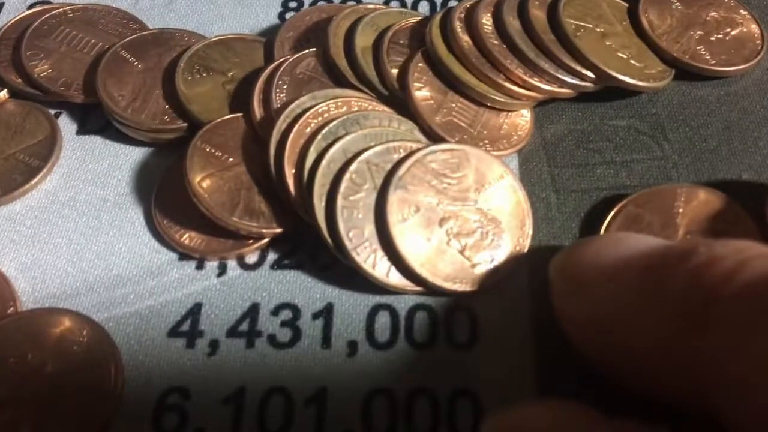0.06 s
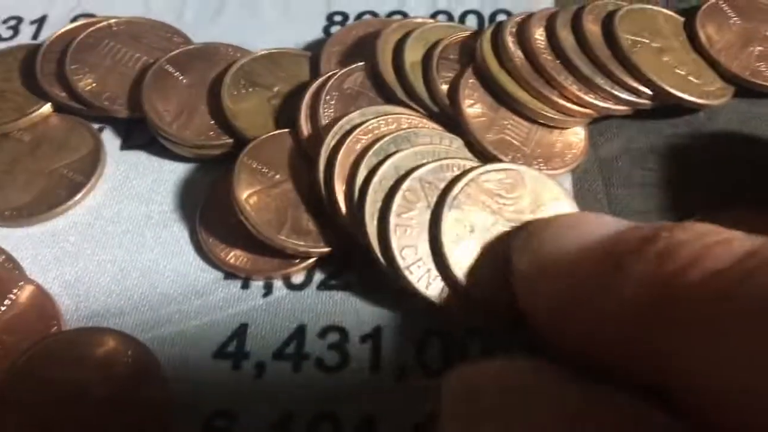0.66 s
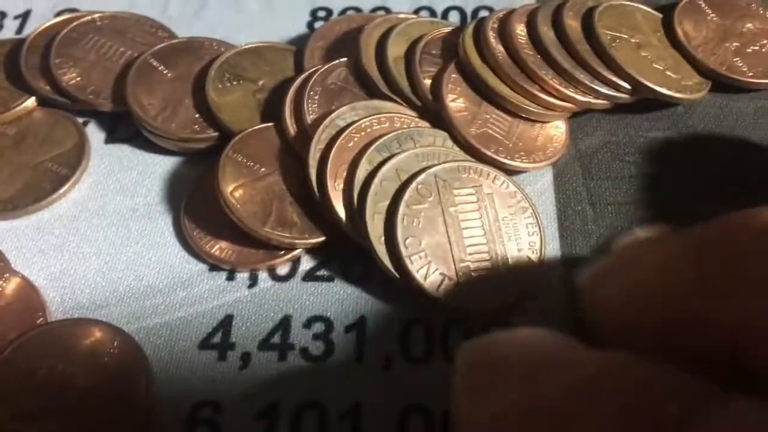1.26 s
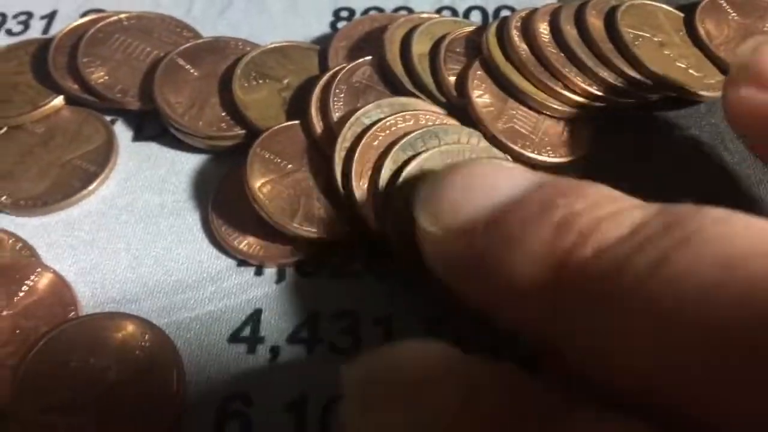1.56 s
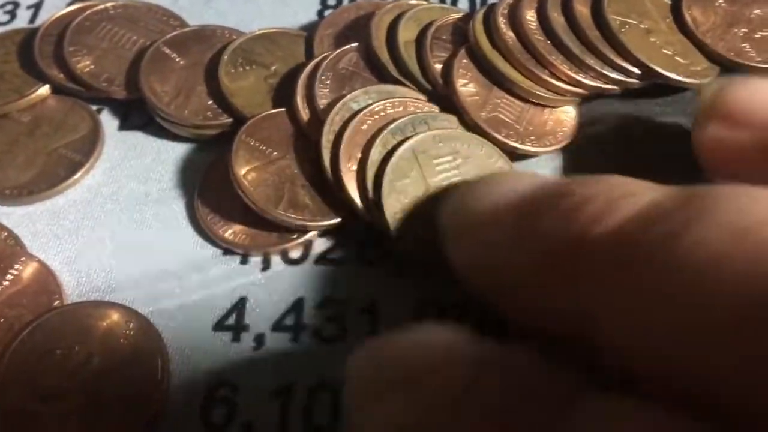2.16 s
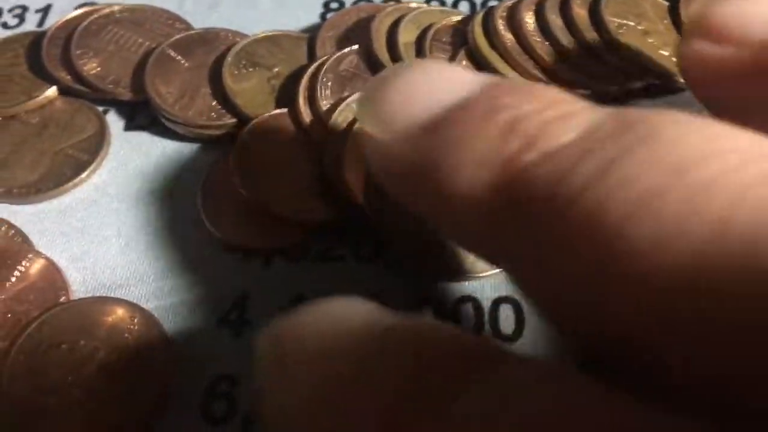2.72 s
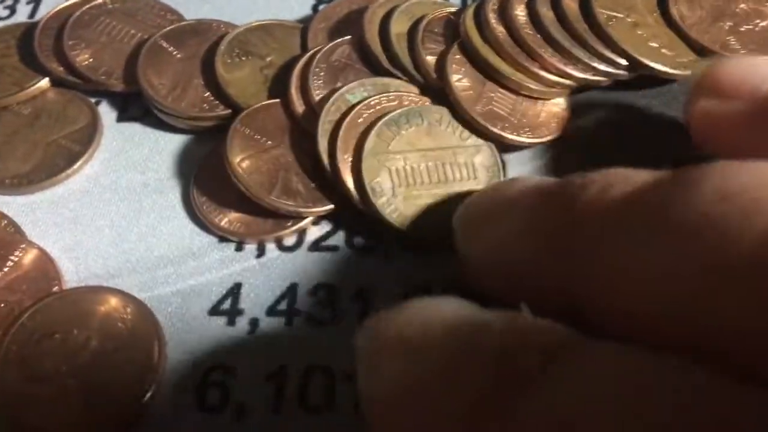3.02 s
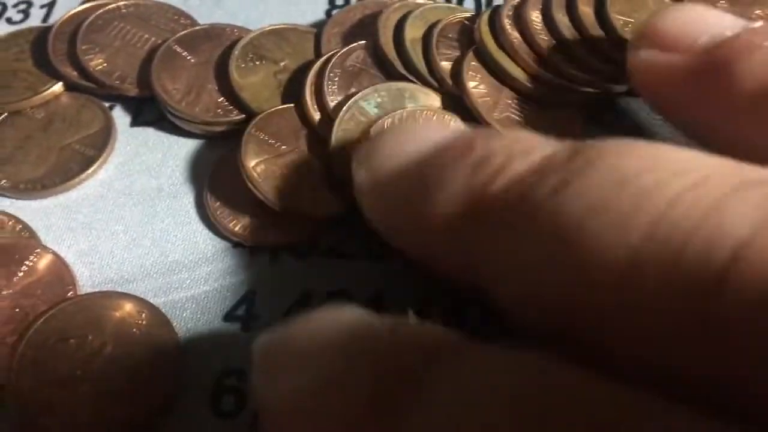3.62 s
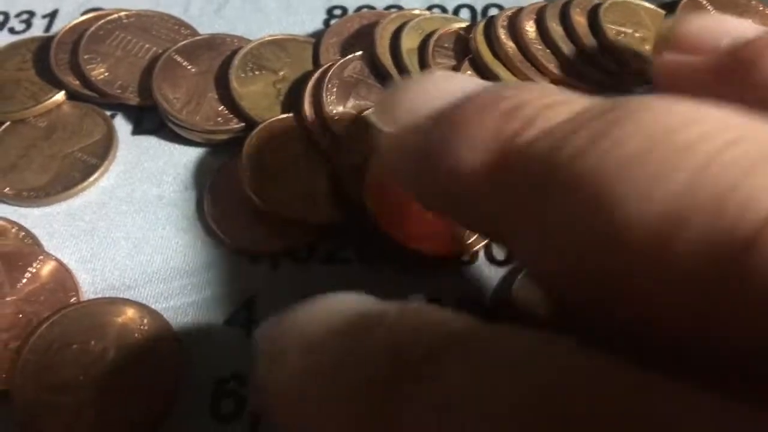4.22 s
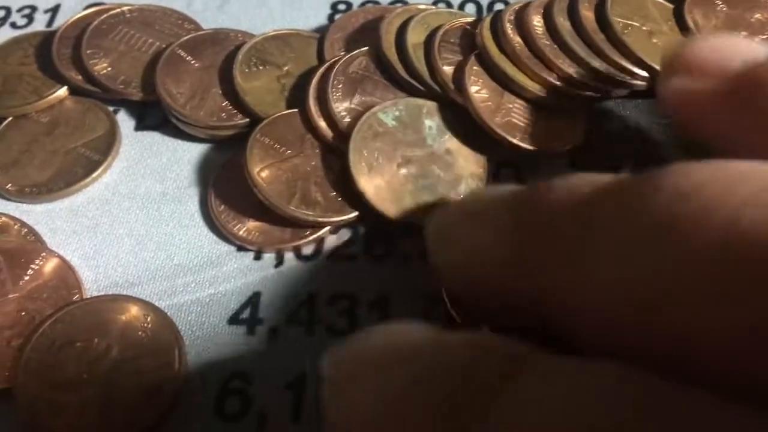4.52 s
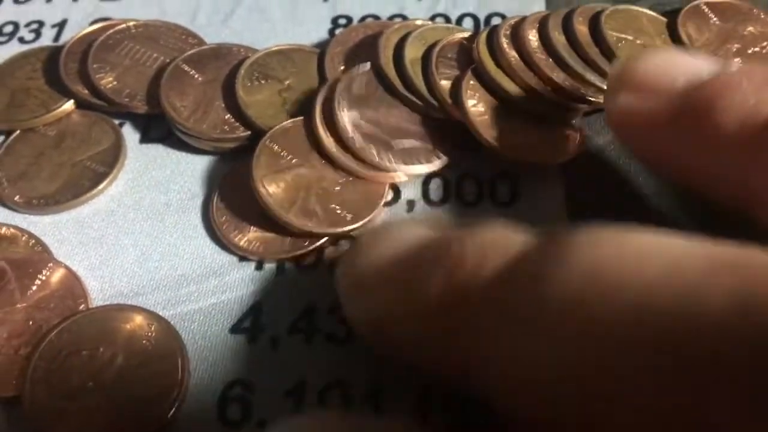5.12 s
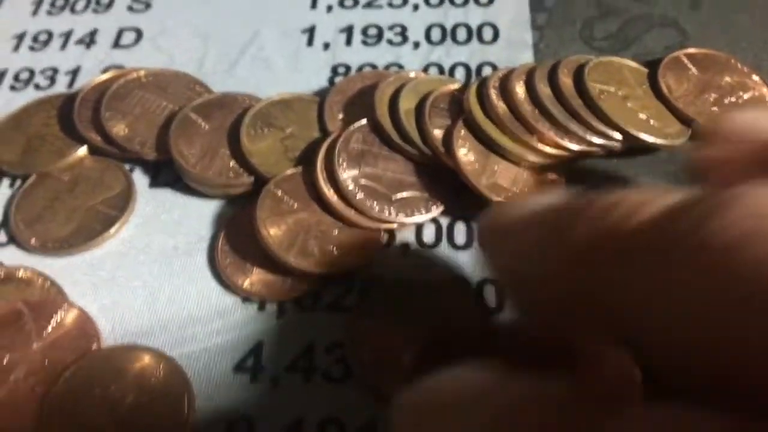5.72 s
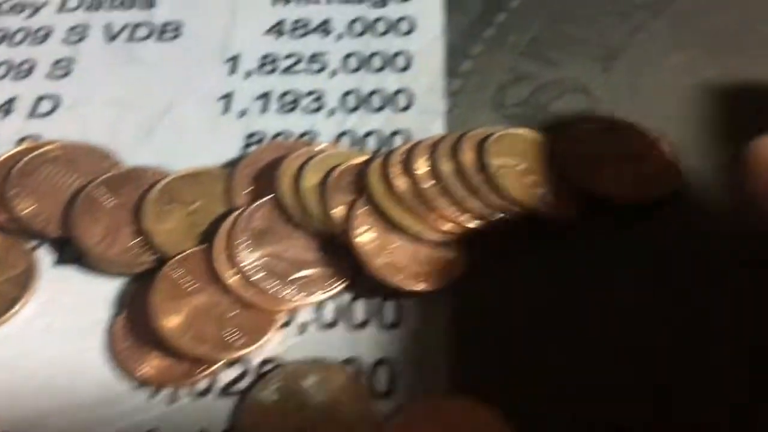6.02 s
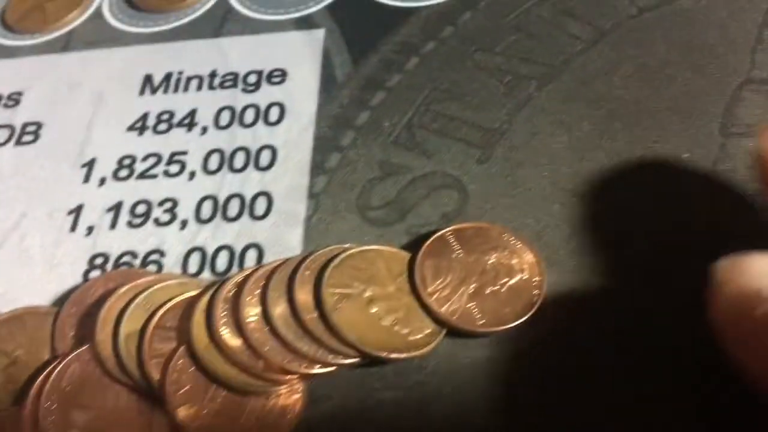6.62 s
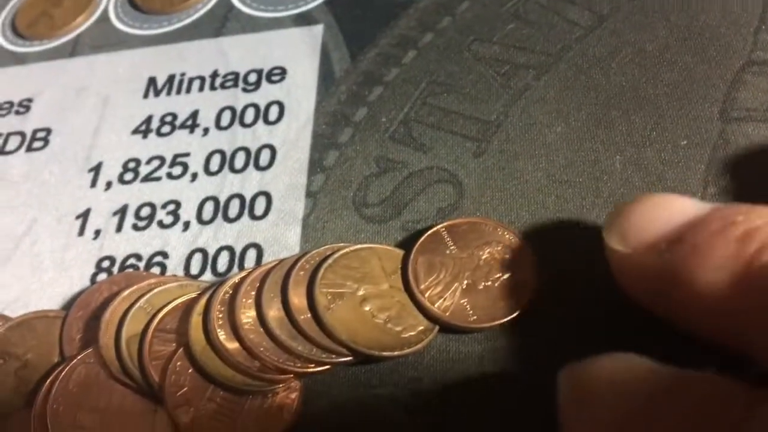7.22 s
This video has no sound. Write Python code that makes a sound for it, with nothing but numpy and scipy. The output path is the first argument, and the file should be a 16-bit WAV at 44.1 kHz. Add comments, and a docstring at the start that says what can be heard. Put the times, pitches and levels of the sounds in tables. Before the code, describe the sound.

Copper coins are slid by a fingertip off an overlapping row onto paper on a table, heard close and only on the left. A few faint metal ticks begin around 0.3 seconds and grow near 0.9. At about 1.1 seconds the first coin scrapes over its neighbours and tips onto the table with a light knock and a bright chatter, its very high ring quickly stilled. Five more coins follow, landing at about 2.3, 3.1, 3.9, 4.6 and 5.2 seconds, each with small clicks, a short gritty scrape and a knock, most with a brief ring. Between them come stray ticks and the soft rub of skin on paper. A soft tap at 5.7 seconds leads into a quiet, dry swish, with fainter ones around 6.4 and 7.1. A faint, low appliance hum fills the small room throughout.

```python
"""Copper coins, dragged one by one by a fingertip off an overlapping row on paper on a table, close by.
Six times a coin clicks, scrapes over its neighbours and tips onto the table, which knocks as it bends.
The coins chatter with a short, high ring until the finger stills them. In between the finger rubs
the paper; a small room hums faintly. Left channel only."""
import sys
import numpy as np
from scipy import signal
from scipy.fft import rfft, irfft, next_fast_len
from scipy.io import wavfile
from scipy.ndimage import map_coordinates

SR = 44100
rng = np.random.default_rng(int(sys.argv[2]) if len(sys.argv) > 2 else 0)


def wrap_up_sound(samples):
    """Save the sound to the file named by the first command line argument, as 16-bit audio."""
    columns = np.atleast_2d(samples).T
    # keep every value between -1 and 1, then stretch to whole-number steps
    tamed = np.clip(columns, -1, 1)
    steps = np.round(tamed * 32767).astype(np.int16)
    wavfile.write(sys.argv[1], SR, steps)


N = 320607


def amp(db):
    return 10 ** (np.asarray(db) / 20)


def unit_rms(x):
    return x / np.sqrt(np.mean(x ** 2) + 1e-20)


def log_interp(points, hz):
    """(f/Hz, value) points read on a log frequency axis."""
    f, values = np.transpose(points)
    return np.interp(np.log(hz + 1), np.log(f + 1), values)


def wobble(knots_per_s):
    """Smooth random curve."""
    knots = rng.standard_normal(int(N * knots_per_s / SR) + 4)
    return map_coordinates(knots, [np.arange(N) * knots_per_s / SR])


def filtered(x, response):
    """x through a gain given as a function of f/Hz."""
    size = next_fast_len(N + SR // 2)
    return irfft(rfft(x, size) * response(np.fft.rfftfreq(size, 1 / SR)), size)[:N]


def coloured(x, spectrum):
    """x shaped by a spectrum, at rms 1."""
    return unit_rms(filtered(x, lambda hz: amp(log_interp(spectrum, hz))))


def minimum_phase(db):
    """Causal response with these gains."""
    cepstrum = irfft(np.log(amp(db) + 1e-6))
    half = len(cepstrum) // 2
    cepstrum[1:half] *= 2
    cepstrum[half + 1:] = 0
    return np.exp(rfft(cepstrum))


def resonance(hz, width_hz):
    """Narrow noise band at rms 1; centre given per sample."""
    lowpass = signal.butter(2, width_hz / 2, fs=SR, output="sos")
    a, b = signal.sosfilt(lowpass, rng.standard_normal((2, len(hz))))
    phase = 2 * np.pi * np.cumsum(hz) / SR
    return unit_rms(a * np.cos(phase) + b * np.sin(phase))


def add(track, start_s, sound):
    i = max(round(start_s * SR), 0)
    track[i:i + len(sound)] += sound[:max(N - i, 0)]


# Room noise spectrum: f/Hz, level/dB
AIR_SPECTRUM = [(15, -50.5), (25, -22), (87, -5.5), (123, -1.5), (212, -7.5), (242, -9), (326, -14.5),
                (354, -18.5), (463, -17), (560, -16.5), (1020, -29.5), (1190, -27), (1650, -48.5),
                (2220, -40.5), (16000, -57.5)]
# Appliance hum partials: f/Hz, level/dB
HUM_PARTIALS = [(75, -74), (134, -62), (241, -63), (360.7, -73.5), (436, -75), (554.5, -70.5),
                (742.9, -77.5)]


def room_noise(air_db=-55, hum_db=-1, waver_rad=0.51, flutter_db=2):
    """Low room noise and an appliance's slightly unsteady hum."""
    t, hum = np.arange(N) / SR, np.zeros(N)
    for hz, db in HUM_PARTIALS:
        peak = np.sqrt(2) * amp(db + flutter_db * wobble(4.1))
        hum += peak * np.sin(2 * np.pi * hz * t + waver_rad * wobble(4.8))
    return amp(air_db) * coloured(rng.standard_normal(N), AIR_SPECTRUM) + amp(hum_db) * hum


# Paper friction spectrum: f/Hz, level/dB
RUB_SPECTRUM = [(150, -18), (400, 9), (650, 4.5), (900, -1), (1400, 0.5), (1950, 4), (2300, -5.5),
                (2800, -4), (3500, -17), (4800, -17.5), (6200, -12.5), (8000, -28), (9500, -15.5),
                (15000, -42)]


def finger_rub(peak_db=-61, rest_db=-77, lead_s=0.084, slope_db_per_s=42, fibre_db=2):
    """The finger rubs softly over paper and coins, hardest just before each landing."""
    t = np.arange(N) / SR
    envelope = amp(rest_db)
    for _, landing, *_ in COIN_DRAGS:
        away_s = np.maximum(landing - lead_s - t, 0) + np.maximum(t - landing, 0)
        envelope = np.maximum(envelope, amp(peak_db - slope_db_per_s * away_s))
    fibres = amp(fibre_db * wobble(200)) * rng.standard_normal(N)
    return envelope * coloured(fibres, RUB_SPECTRUM)


# Coin edges catching on each other: t/s, level/dB, brightness/dB
EDGE_CATCHES = [(0.298, -58.5, -20), (.311, -52, -17), (.332, -73, -19), (0.353, -64, -33),
                (0.3727, -72, -32), (.5257, -48, -7), (.803, -58, -13), (0.818, -58, -2.5),
                (.923, -43.5, 4.5), (0.9257, -35, -6), (0.9302, -45, 6), (0.996, -55.5, -0.5),
                (1.041, -50.5, -5.5), (1.081, -40.5, -10), (1.0867, -35.5, 0), (1.094, -39, 3),
                (1.133, -27.5, 20.5), (1.1446, -33.5, 2), (1.157, -29, 12.5), (1.176, -40, 1.5),
                (1.273, -63, -31), (1.6031, -44.5, -4.5), (2.019, -61, 5), (2.026, -44, -7),
                (2.037, -40, -17.5), (2.046, -54, 3.5), (2.123, -46, -3), (2.154, -53, -18),
                (2.1814, -47, 0), (2.213, -52, -12.5), (2.238, -40, 0.5), (2.276, -46.5, -6),
                (2.288, -40.5, 2), (2.3079, -31, 8.5), (2.858, -34, -2.5), (2.863, -33.5, 0),
                (2.88, -43.5, -2), (2.9411, -39.5, -1), (2.958, -44, -7), (2.994, -47, -3),
                (3.004, -53, -8), (3.022, -43.5, -1), (3.035, -40.5, -2), (3.08, -37.5, 0), (3.082, -41, 4),
                (3.105, -64, -12), (3.618, -36.5, 0.5), (3.6348, -41, 2), (3.695, -46, -10),
                (3.72, -48, -11), (3.733, -48, -12), (3.776, -51.5, -21), (3.819, -44.5, -10),
                (3.837, -39.5, 0), (3.8635, -43, -2), (4.369, -43.5, -6), (4.3875, -63, -12),
                (4.48, -45, -11), (4.543, -38, 9), (4.582, -48, 15), (4.601, -47.5, 1), (4.642, -49, -9),
                (5.021, -42.5, -4), (5.029, -47, -6), (5.07, -50, -6), (5.1239, -45.5, -4),
                (5.136, -39, -1.5), (5.159, -41.5, 10), (5.1693, -56, -3), (5.21, -34.5, 4.5),
                (5.2134, -29, 5.5), (5.2477, -52, -6), (6.585, -73.5, -11)]


def contacts(graze_s=0.0018, graze_db=-21.5, rebound_s=0.0056, rebound_db=-10,
             tick_gap_s=1 / 70, tick_db=0.5, tick_spread_db=6.5, tick_bright_db=-10.5):
    """Rims graze, catch and rebound; a dragged coin ticks. Rows: t/s, level/dB, brightness/dB."""
    rows = list(EDGE_CATCHES)
    for s, db, bright_db in EDGE_CATCHES:
        rows.append((s - graze_s, db + graze_db, bright_db))
        rows.append((s + rebound_s * rng.uniform(.6, 2.5), db + rebound_db, bright_db))
    for start, landing, db, swell_db, *_ in COIN_DRAGS:
        gaps, louds, brights = rng.standard_normal((32, 3)).T
        times = start + tick_gap_s * np.cumsum(np.exp(.5 * gaps))
        for s, loud, bright in zip(times[times < landing + 2 * SETTLE_S], louds, brights):
            level_db = scrape_db(s, start, landing, db, swell_db) + tick_db + tick_spread_db * loud
            rows.append((s, level_db, tick_bright_db + 2 * tick_spread_db * bright))
    return rows


# Metal-on-metal spectrum: f/Hz, level/dB
CLICK_SPECTRUM = [(200, 5.5), (600, -11), (1200, -17.5), (1950, 2.5), (2250, -4), (2650, 2), (3600, -18),
                  (4600, -9), (6200, 1), (8000, 0), (11000, -1), (13500, 4.5), (15300, -2), (16500, -30)]


def coin_clicks(firm_t60_s=0.014, firm_db=-36, doubling_db=22, attack_s=0.0009, tail_db=-33,
                tail_t60_s=0.087, grit_db=-4, spot_db=1, light_db=-48, thinning=.8, gain_db=1, size=4096):
    """Bursts of tiny slips, choked by finger and pile; light contacts are shorter and thinner."""
    out, t, hz = np.zeros(N), np.arange(size) / SR, np.fft.rfftfreq(size, 1 / SR)
    treble = 1 / (1 + (10500 / (hz + 1)) ** 8)
    body = 1 / (1 + (hz / 3800) ** 8)
    for s, db, bright_db in contacts():
        t60_s = firm_t60_s * 2 ** ((db - firm_db) / doubling_db)
        decay = amp(-60 * t / t60_s) + amp(tail_db - 60 * t / tail_t60_s)
        grit = amp(grit_db * map_coordinates(rng.standard_normal(size), [np.arange(size) / 20]))
        slips = rng.standard_normal(size) * grit * (1 - np.exp(-t / attack_s)) * decay
        # each contact point has its own resonances
        ripple_db = spot_db * map_coordinates(rng.standard_normal(size), [hz / 450])
        tilt_db = bright_db * treble + thinning * min(db - light_db, 0) * body
        click = irfft(rfft(slips) * minimum_phase(log_interp(CLICK_SPECTRUM, hz) + tilt_db + ripple_db))
        click *= np.sqrt(.004 * SR) / np.linalg.norm(click)  # energy of 4 ms at rms 1
        add(out, s, amp(db + gain_db) * click)
    return out


# Landed coins rocking free: t/s, f/Hz, level/dB, time until the finger stills them/s
FREE_RINGS = [(1.132, 12520, -30, 0.026), (1.1436, 12050, -31, 0.039), (1.157, 12230, -22, 0.018),
              (1.1652, 12800, -28.5, 0.049), (1.1751, 12760, -30, .025), (2.2913, 12300, -32, 0.027),
              (2.3084, 12600, -20.5, 0.035), (3.076, 12830, -28, 0.038), (3.8548, 12860, -29, 0.026),
              (3.865, 12880, -32, 0.051), (5.214, 12130, -31, .015)]


def coin_rings(attack_s=.0009, split_hz=165, twin_db=-13, grip_power=1.7, pile_db=-33, pile_t60_s=0.1,
               coin_hz=12550, spread_hz=120, catch_db=-10.5, catch_t60_s=0.018, gain_db=2):
    """A coin's lowest bending mode, a close pair, is damped ever faster; the pile rings on weakly."""
    out, t = np.zeros(N), np.arange(SR // 6) / SR

    def tone(hz):
        return np.sin(2 * np.pi * (hz * t + rng.random()))

    # each catch also rings its coin, a dull one less
    damped = [(s, rng.normal(coin_hz, spread_hz), db + catch_db + min(bright_db, 0), catch_t60_s)
              for s, db, bright_db in EDGE_CATCHES]
    for s, hz, db, t60_s in FREE_RINGS + damped:
        drift_rad = 0.11 * np.cumsum(rng.standard_normal(len(t)))  # shifting pressure bends the pitch
        pair = np.sin(2 * np.pi * hz * t + drift_rad) + amp(twin_db) * tone(hz - split_hz)
        pile = tone(hz) + .4 * tone(12580) + .4 * tone(12010) + .2 * tone(13355) + .2 * tone(10765)
        ring = pair * amp(-60 * (t / t60_s) ** grip_power) + pile * amp(pile_db - 60 * t / pile_t60_s)
        add(out, s, amp(db + gain_db) * ring * (1 - np.exp(-t / attack_s)))
    return out


# Table's response to a knock: f/Hz, level/dB
KNOCK_SPECTRUM = [(30, -26), (70, -5.5), (150, -3.5), (240, 1), (380, 5), (620, 1), (800, -11.5),
                  (1200, -5), (1800, -8), (2300, -22.5), (2800, -23.5), (3600, -46), (7000, -62.5)]
# Its lasting modes: f/Hz, level/dB, t60/s
KNOCK_MODES = [(72.5, -24, .2), (138.5, -42, .12), (243, -33, 0.042), (339.2, -21.5, 0.092),
               (547, -36, 0.044), (654, -30.5, 0.03)]


def table_knocks(spread_s=0.000818, hard_hz=900, scatter_db=-33, scatter_t60_s=0.046, spot_octaves=0.4,
                 nudge_db=-6.5, nudge_hard_db=-1, nudge_hz=2600, nudge_lift_db=12, size=8192):
    """Bending waves cross the table, high ones first; its edges scatter them, its modes ring on."""
    out, t, hz = np.zeros(N), np.arange(size) / SR, np.fft.rfftfreq(size, 1 / SR)
    dispersion = np.exp(-4j * np.pi * spread_s * np.sqrt(hz * hard_hz))
    landings = [(drag[1], *drag[-4:]) for drag in COIN_DRAGS]
    nudges = [(s, db + nudge_db, nudge_hard_db, nudge_hz, nudge_lift_db) for s, db, _ in EDGE_CATCHES]
    for s, db, hardness_db, spot_hz, lift_db in landings + nudges:
        push = amp(scatter_db - 60 * t / scatter_t60_s) * rng.standard_normal(size)
        push[0] = 1  # direct impact
        spot_db = lift_db * np.exp(-(np.log2((hz + 1) / spot_hz) / spot_octaves) ** 2)
        shelf_db = hardness_db * hz ** 2 / (hz ** 2 + hard_hz ** 2)
        response = minimum_phase(log_interp(KNOCK_SPECTRUM, hz) + spot_db + shelf_db)
        knock = irfft(rfft(push) * response * dispersion)
        knock /= np.abs(knock).max()
        for mode_hz, mode_db, t60_s in KNOCK_MODES:
            decay = amp(mode_db + rng.normal(0, 2.4) - 60 * t / t60_s)
            build_up = 1 - np.exp(-mode_hz * t)
            knock += build_up * decay * np.sin(2 * np.pi * mode_hz * t)
        add(out, s, amp(db) * knock)
    return out


# Finger sweeps over paper and coins, and one soft tap at 5.68 s:
# start/s, end/s, level/dB, hiss f/Hz, relative hiss level/dB
FINGER_TOUCHES = [(0.407, 0.557, -74.5, 6000, -27), (0.787, 0.884, -64, 6000, -14),
                  (1.42, 1.603, -64, 6000, -15), (1.6, 2.04, -73, 6000, -9.5),
                  (2.357, 2.568, -67.5, 6000, -11.5), (2.701, 2.857, -65, 6000, -15),
                  (3.489, 3.632, -63, 6100, -13), (4.011, 4.124, -73, 6100, -22),
                  (5.675, 5.703, -68, 6100, -24), (5.744, 5.922, -59, 6100, -5.5),
                  (6.184, 6.603, -76.5, 3720, 0.5), (7.086, 7.241, -71, 6200, -10)]
# Swish spectrum: f/Hz, level/dB
SWISH_SPECTRUM = [(500, -4), (1300, 6.5), (1950, 11), (2300, 5.5), (2800, 3.5), (3500, -11), (4600, -1.5),
                  (5400, -17), (8500, -7), (10500, -10), (15500, -17.5)]


def finger_touches(width_hz=1300, fade_db=5, fibre_db=1.5):
    """Skin on paper: a dry swish with one hissing resonance; the shortest is heard as a soft tap."""
    out = np.zeros(N)
    for start, end, db, hiss_hz, hiss_db in FINGER_TOUCHES:
        n = round((end - start) * SR)
        swish = coloured(rng.standard_normal(N), SWISH_SPECTRUM)[:n]
        hiss = amp(hiss_db) * resonance(np.full(n, hiss_hz), width_hz)
        envelope = amp(db - fade_db * np.linspace(0, 1, n) ** 2) * signal.windows.tukey(n, .45)
        add(out, start, envelope * (swish + hiss))
    return out * amp(fibre_db * wobble(200))


SETTLE_S, STOP_DB_PER_S = 0.015, 380.5


def scrape_db(t, start, landing, db, swell_db):
    """A scrape swells up to the landing, holds while the coin settles, then dies."""
    to_go = np.clip((landing - t) / (landing - start), 0, 1)
    return db - swell_db * to_go - STOP_DB_PER_S * np.maximum(t - landing - SETTLE_S, 0)


# Coins dragged off the row: start/s, landing/s, final scrape level/dB, swell/dB, starting resonance/Hz,
# table murmur/dB, knock level/dB, hardness/dB, landing spot's resonance/Hz, its lift/dB
COIN_DRAGS = [(1.023, 1.131, -46, 16, 7000, -44, -18, -22, 713, 11.5),
              (2.112, 2.2919, -61.5, 6, 6000, -48.5, -14, -4.5, 1310, 6),
              (2.93, 3.082, -54, 8, 6300, -47, -14.5, 15.5, 686, 9.5),
              (3.682, 3.8562, -51.5, 22.5, 9200, -48.5, -18, -1, 680, 8.5),
              (4.421, 4.5661, -52.5, 12, 7400, -49, -20, 15.5, 288, 12),
              (5.028, 5.207, -52.5, 2, 8030, -54, -16.5, -4.5, 770, 10)]
# Coin grating on coin: f/Hz, level/dB
GRATING_SPECTRUM = [(1200, -11), (2000, 1), (2800, -4.5), (3700, -7.5), (4700, -2), (6200, -9), (9300, -6),
                    (10700, -23), (13000, 5.5), (15300, -12.5), (16300, -19.5)]
# Table's murmur under a scrape: f/Hz, level/dB
MURMUR_SPECTRUM = [(100, -19.5), (270, 6.5), (400, -1.5), (650, -2.5), (900, -15.5), (1800, -20.5),
                   (3000, -38.5)]


def coin_scrapes(landed_hz=6490, width_hz=900, song_db=-2, upper_ratio=1.27, upper_db=-5, grit_db=6,
                 judder_db=5, dull_db=-9, dull_hz=10500, attack_s=0.017, table_swell_db=12, gain_db=-3):
    """Embossed faces grate in uneven slips, ever brighter, exciting coin resonances and the table."""
    out, t = np.zeros(N), np.arange(N) / SR
    # tanh: the relief is of even height, so no slip stands out
    judder = unit_rms(amp(judder_db * np.tanh(wobble(200))))
    relief = judder * amp(grit_db * np.tanh(wobble(900)))
    grating = coloured(relief * rng.standard_normal(N), GRATING_SPECTRUM)
    treble = filtered(grating, lambda hz: 1 / (1 + (dull_hz / (hz + 1)) ** 8))
    murmur = coloured(judder * rng.standard_normal(N), MURMUR_SPECTRUM)
    for start, landing, level_db, swell_db, start_hz, table_db, *_ in COIN_DRAGS:
        on = (t >= start) & (t < landing + SETTLE_S + 60 / STOP_DB_PER_S)
        to_go = np.interp(t[on], [start, landing], [1, 0])
        hz = landed_hz + (start_hz - landed_hz) * to_go  # glides as the coin leaves the row
        song = resonance(hz, width_hz) + amp(upper_db) * resonance(hz * upper_ratio, 2 * width_hz)
        metal = grating[on] + (amp(dull_db * to_go) - 1) * treble[on]
        metal += amp(song_db) * song * judder[on]
        metal *= amp(scrape_db(t[on], start, landing, level_db + gain_db, swell_db))
        table = murmur[on] * amp(scrape_db(t[on], start, landing, table_db, table_swell_db))
        out[on] += (metal + table) * np.minimum((t[on] - start) / attack_s, 1)
    return out


# Room decay: f/Hz, t60/s
ROOM_DECAY = [(100, 0.38), (1000, 0.18), (6000, 0.2), (14000, 0.12)]


def room_reverb(x):
    """A small room's tail; the treble dies first."""
    hz, t, noise = signal.stft(rng.standard_normal(SR // 2), SR, nperseg=256)
    decay = amp(-60 * t / log_interp(ROOM_DECAY, hz)[:, None])
    _, tail = signal.istft(noise * decay, SR, nperseg=256)
    return signal.fftconvolve(x, tail / np.linalg.norm(tail))[:N]


def scene(reverb_db=-23, gain=2):
    """One microphone, on the left channel."""
    direct = finger_rub() + coin_clicks() + coin_rings() + table_knocks()
    direct += finger_touches() + coin_scrapes()
    left = gain * (direct + amp(reverb_db) * room_reverb(direct) + room_noise())
    return np.array([left, np.zeros(N)])


def record(dry, low_cut_hz=19, top_hz=16000):
    """The microphone drops the deepest bass; a steep band limit cuts the top."""
    highpass = signal.butter(3, low_cut_hz, "high", fs=SR, output="sos")
    return np.array([filtered(channel, lambda hz: 1 / np.sqrt(1 + (hz / top_hz) ** 160))
                     for channel in signal.sosfilt(highpass, dry)])


dry = scene()
out = record(dry)
wrap_up_sound(out)
```